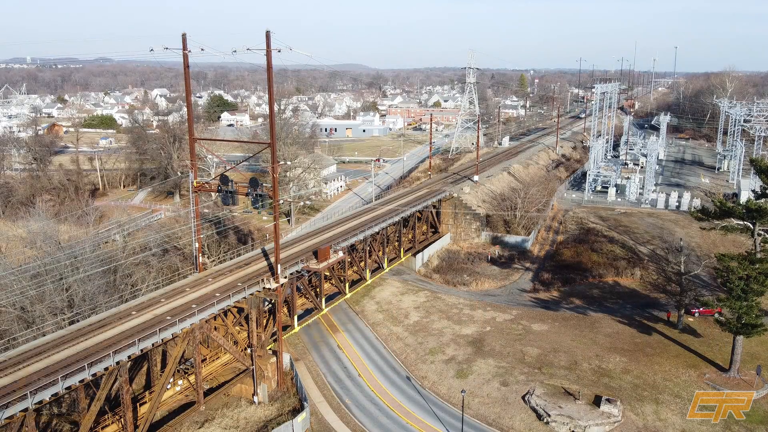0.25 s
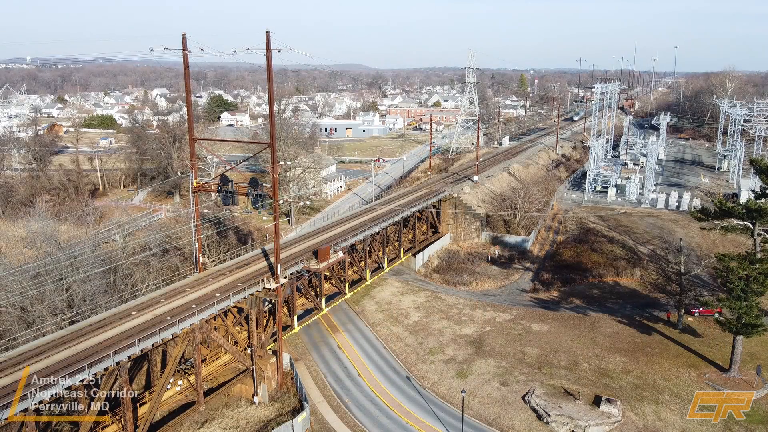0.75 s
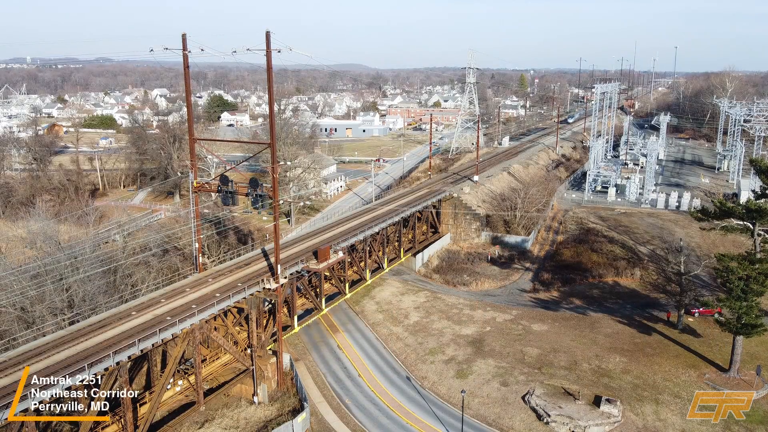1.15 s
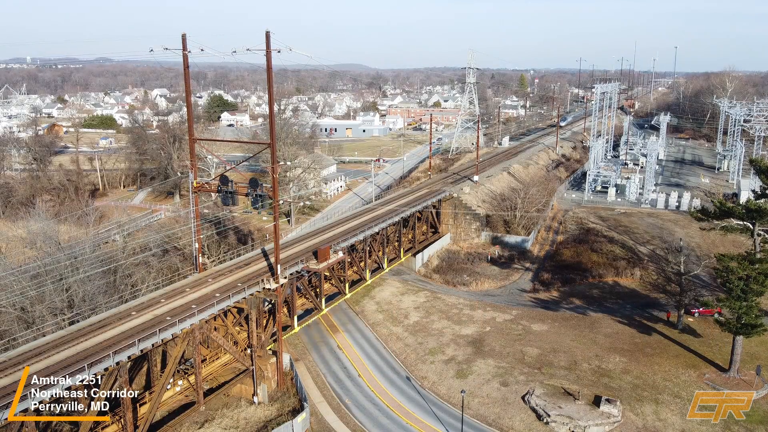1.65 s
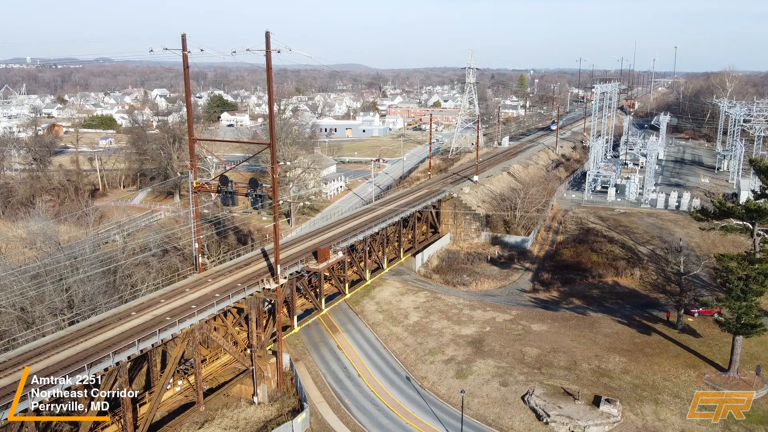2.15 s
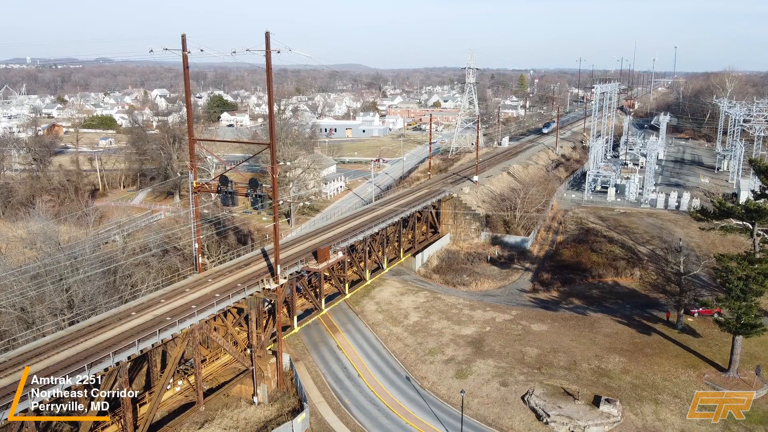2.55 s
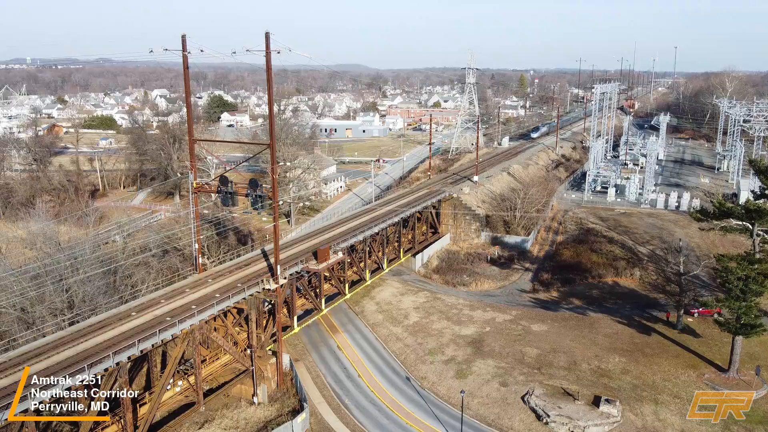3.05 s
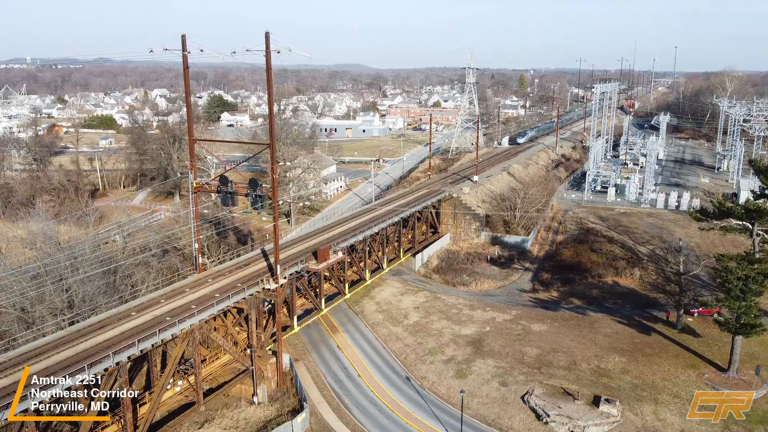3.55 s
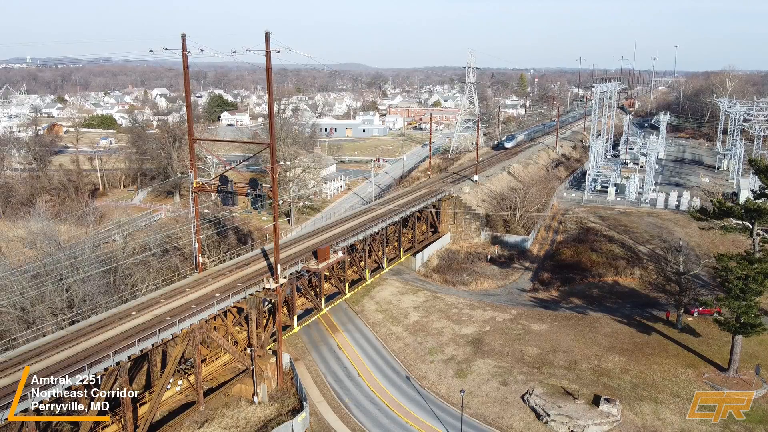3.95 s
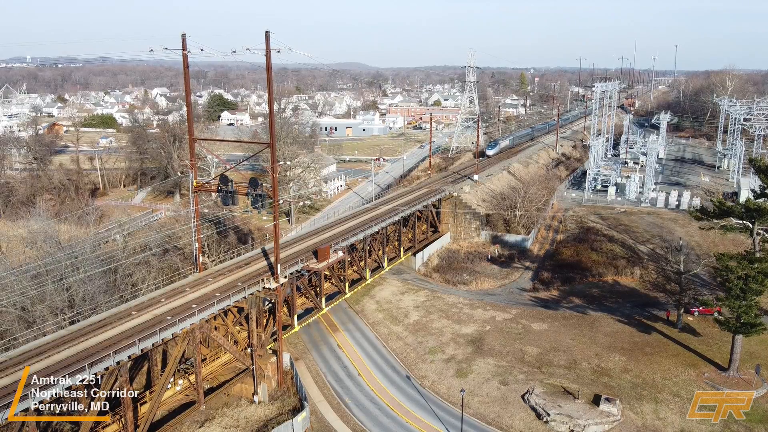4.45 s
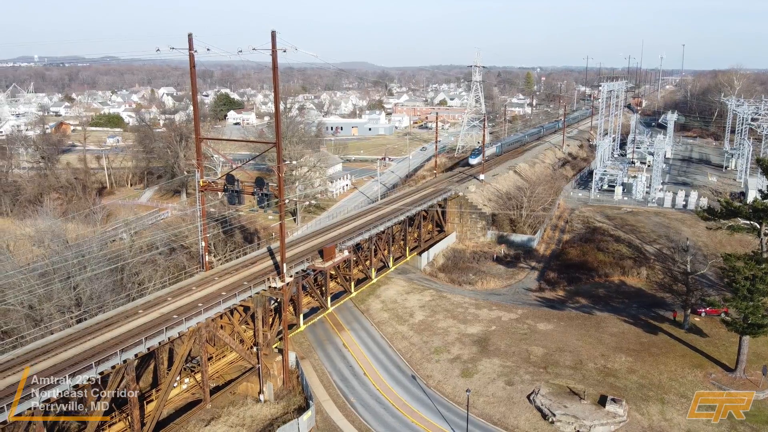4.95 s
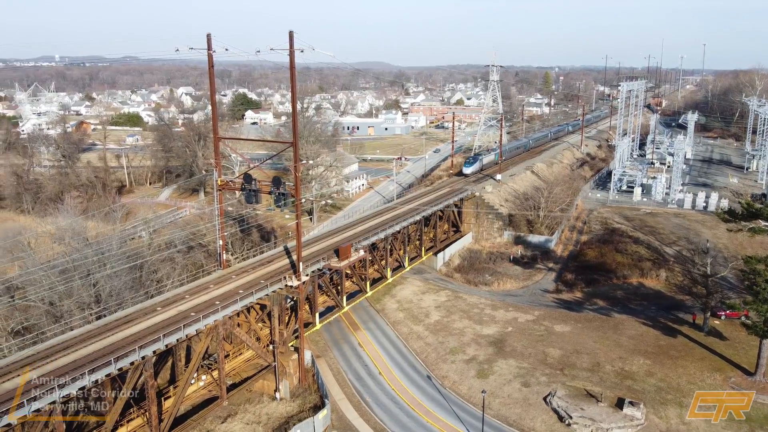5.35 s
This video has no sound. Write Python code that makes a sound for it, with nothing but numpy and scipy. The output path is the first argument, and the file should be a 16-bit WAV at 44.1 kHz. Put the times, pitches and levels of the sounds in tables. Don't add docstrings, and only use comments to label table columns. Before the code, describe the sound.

A faint town hum and gusty microphone rumble give way to an approaching train, its rolling roar growing over dull, booming thumps on a steel viaduct.

```python
import sys
import numpy as np
from scipy import signal
from scipy.fft import rfft, irfft, next_fast_len
from scipy.io import wavfile
from scipy.ndimage import uniform_filter1d

SR = 44100
rng = np.random.default_rng(int(sys.argv[2]) if len(sys.argv) > 2 else 0)


def decibels_to_gain(level_db):
    exponent = np.asarray(level_db, float) / 20
    return 10 ** exponent


def generate_wav(signal):
    frames = np.transpose(np.atleast_2d(signal))
    scaled = np.clip(frames, -1, 1) * 32767
    pcm = np.round(scaled).astype(np.int16)
    wavfile.write(sys.argv[1], SR, pcm)


N = 246519
TIME = np.arange(N) / SR
SIZE = next_fast_len(N)
BINS = np.log2(np.arange(1, SIZE // 2 + 2) * SR / SIZE)
SIDES = np.array([[1], [-1]])

# (frequency [Hz], likeness [0-1])
TRAIN_ALIKE = [(60, 0.98), (180, 0.42), (300, 0.21), (600, 0.27), (1000, 0.37), (2600, 0.27), (8000, 0.46)]
# (time [s], peak level [dB], mode frequency [Hz])
JOINTS = [(3.88, -28.5, 150), (3.969, -30.5, 158.4), (4.037, -39.5, 157), (4.148, -26, 143),
          (4.25, -29, 164), (4.469, -32.5, 117), (4.841, -28, 116), (4.908, -29.5, 130), (5.053, -26, 145),
          (5.349, -39, 130), (5.513, -20.5, 252.6)]
CLEAR_DB = -41.5


def along(points):
    hz, value = np.transpose(points)
    return np.interp(BINS, np.log2(hz), value)


def pan(db):
    return decibels_to_gain(SIDES * db / 2)


def walk(rate_hz):
    hold = int(SR / rate_hz)
    steps = np.repeat(rng.standard_normal(N // hold + 1), hold)
    return 1.13 * uniform_filter1d(uniform_filter1d(steps, hold), hold)[:N]


def wash(colour, alike, lo_hz, hi_hz, swell_db, flicker_db, rate_hz, tilt=lambda hz: 0):
    mid, side = rfft(rng.standard_normal((2, SIZE))) * decibels_to_gain(along(colour))
    pair = np.sqrt(1 + alike) * mid + SIDES * np.sqrt(1 - alike) * side
    inside = (BINS > np.log2(lo_hz)) & (BINS < np.log2(hi_hz))
    pair = pair * SIZE / np.sqrt(np.sum(abs(pair[:, inside]) ** 2))
    out, shared = 0, walk(rate_hz / 6)
    for octave in np.arange(3, 14.6, 0.5):
        mask = np.clip(1 - 2 * abs(BINS - octave), 0, 1)
        shared = 0.8 * shared + 0.6 * walk(rate_hz / 6)
        level_db = swell_db * shared + flicker_db * walk(rate_hz) + tilt(2 ** octave)
        out = out + decibels_to_gain(level_db) * irfft(pair * mask, SIZE)[:, :N]
    return out


def ring(at_s, hz, t60_s, size):
    t = np.clip(TIME - at_s, 0, 1)
    return size * np.sin(2 * np.pi * hz * t) * np.exp(-np.log(1000) * t / t60_s) * (t < 1)


def nearness():
    # (time [s], level [dB])
    approach = [(0, -58.5), (1.5, -53.5), (2.3, -48.5), (2.75, -45.5), (3.0, -44.5), (3.43, -41.5),
                (3.8, -38.5), (4.0, -37), (4.25, -36), (4.6, -35.5), (4.8, -34.5), (5.0, -34.5),
                (5.18, -33), (5.4, -32.5), (5.59, -29.5)]
    roar_db = np.interp(TIME, *np.transpose(approach))
    return roar_db, np.clip(roar_db - CLEAR_DB, 0, None)


def puffs_db():
    # (time [s], level over the rush [dB])
    puffs = [
        (5.205, 4.5),
        (5.5, 0.5),
    ]
    puff_s = 0.037
    return sum(db * np.exp(-((TIME - s) / puff_s) ** 2) for s, db in puffs)


def town():
    # (frequency [Hz], level [dB per Hz])
    town_colour = [(30, -16), (60, 6.5), (120, -2), (250, -12), (400, -11), (700, -11), (1050, -12.5),
                   (2200, -15), (2500, -25.5), (4000, -34), (6000, -40.5), (12000, -72)]
    # (frequency [Hz], likeness [0-1])
    town_alike = [(40, 1), (100, 0.96), (180, 0.69), (400, .2), (1500, 0.39), (6000, 0.11)]
    return decibels_to_gain(-51.0) * pan(-1.6) * wash(town_colour, along(town_alike), 65.6, 3000, 0.17, 0.76, 9.45)


def wind():
    # (time [s], peak level [dB], length [s])
    gusts = [(0.084, -40.5, 0.12), (0.313, -38, 0.026), (0.564, -37.5, 0.25), (0.97, -36.5, 0.15),
             (1.297, -41.5, 0.16), (1.62, -37, 0.1), (1.883, -34, 0.21), (2.38, -36.5, 0.27),
             (2.617, -36, 0.033), (2.81, -34, 0.14), (3.063, -34, .03), (3.152, -30, 0.044),
             (3.45, -32, 0.13), (3.74, -36.5, 0.14), (4.004, -37, 0.051), (4.35, -41, 0.21),
             (4.702, -39.5, 0.11), (4.998, -38.5, 0.15), (5.18, -35, 0.094), (5.476, -29, 0.13)]
    # (frequency [Hz], level [dB per Hz])
    buffet = [(8, 4), (20, 3), (42, 5), (55, -8.5), (80, -12), (140, -45.5), (600, -110)]
    lull_db = -51.5
    force = decibels_to_gain(lull_db) + sum(decibels_to_gain(db) * np.exp(-((TIME - s) / length_s) ** 2) for s, db, length_s in gusts)
    return force * decibels_to_gain(-0.97) * pan(1.5) * wash(buffet, 0.94, 8.4, 55, 0.74, 0.36, 6.6)


def far_birds():
    # (time [s], length [s], start frequency [Hz], end frequency [Hz], level [dB])
    chirps = [(.03, .025, 3900, 4400, -70), (.115, .02, 4700, 5300, -77), (.37, .03, 7600, 7700, -80),
              (.45, .05, 3750, 3600, -72), (.49, .025, 6000, 5650, -74), (.805, .025, 4900, 4850, -72),
              (.9, .03, 3600, 3600, -72), (1.125, .06, 5250, 5700, -72), (1.18, .06, 5700, 6050, -75),
              (1.62, .06, 5950, 5450, -75), (1.86, .06, 5350, 4300, -69), (2.44, .045, 7000, 7900, -78),
              (2.61, .07, 6300, 6700, -81), (2.68, .025, 7700, 7500, -79), (2.72, .025, 7500, 8000, -81),
              (2.98, .08, 7800, 8100, -80)]
    out = 0
    for s, length_s, start_hz, end_hz, db in chirps:
        u = np.clip((TIME - s) / length_s, 0, 1)
        hz = start_hz + (end_hz - start_hz) * u + 90 * walk(250)
        out = out + decibels_to_gain(db + 0.5) * np.sin(np.pi * u) * np.sin(2 * np.pi * np.cumsum(hz) / SR)
    return out * decibels_to_gain(3.3 * walk(150))


def near_bird():
    # (time [s], length [s], level [dB], start frequency [Hz], end frequency [Hz])
    trills = [
        (0.706, .095, -57, 9400, 9020),
        (0.835, 0.17, -68, 8230, 9200),
        (2.784, .205, -67.5, 9900, 8830),
    ]
    rest_hz, scoop_s, glide_ease = 8350, 0.02, 0.7
    end_drop_hz, end_drop_s = 600, 0.008
    swell_db, attack_s, release_s = 4, 0.015, 0.012
    trill_hz, trill_depth, depth_per_db, soft_call_db = 195, 0.32, 0.05, -67
    wall_echo_s, wall_echo_db = 0.217, -14
    out = 0
    for s, length_s, top_db, start_hz, end_hz in trills:
        t = np.clip(TIME - s, 0, length_s)
        db = top_db + swell_db * (t / length_s - 1)
        hz = start_hz + (end_hz - start_hz) * (t / length_s) ** glide_ease
        hz = hz + (rest_hz - start_hz) * np.exp(-t / scoop_s)
        hz = hz - end_drop_hz * np.exp((t - length_s) / end_drop_s)
        depth = np.clip(trill_depth + depth_per_db * (top_db - soft_call_db), 0.3, 0.8)
        beat = np.sin(2 * np.pi * np.cumsum(trill_hz * (1 + 0.08 * walk(62))) / SR)
        edge = np.interp(TIME, [s, s + attack_s, s + length_s - release_s, s + length_s], [0, 1, 1, 0])
        chop = np.clip(1 - depth * (1 - beat), 0, 1) * decibels_to_gain(3.1 * walk(110))
        hz = hz + 650 * depth ** 2 * beat + 100 * walk(140)
        out = out + edge * decibels_to_gain(db + 4.0) * chop * np.sin(2 * np.pi * np.cumsum(hz) / SR)
    return out + decibels_to_gain(wall_echo_db) * np.roll(out, int(wall_echo_s * SR))


def birds():
    direct = near_bird() * pan(3.8) + far_birds() * pan(-2.0)
    tail = rng.standard_normal((2, 6000)) * np.exp(-np.arange(6000) / SR / 0.04)
    return direct + decibels_to_gain(-33.5) * signal.fftconvolve(direct, tail, axes=1)[:, :N]


def lorry():
    # (multiple of base frequency, level [dB])
    lorry_orders = [
        (1, 0),
        (1.25, -9.5),
        (1.75, -8),
    ]
    start_s, shift_s, end_s, level_db = 0.96, 2.6, 2.8, -51.5
    idle_hz, gain_hz_per_s, tires_hz_per_s2, sag_hz_per_s = 90, 37, 5.5, 56
    pulling_s = np.minimum(TIME, shift_s) - start_s
    hz = idle_hz + gain_hz_per_s * pulling_s - tires_hz_per_s2 * pulling_s ** 2
    hz = hz - sag_hz_per_s * np.clip(TIME - shift_s, 0, 1)
    turn = 2 * np.pi * np.cumsum(hz) / SR
    fade = np.interp(TIME, [start_s - 0.1, start_s + 0.14, end_s - 0.2, end_s], [0, 1, 1, 0])
    engine = sum(decibels_to_gain(db + 2.0 * walk(8.94)) * np.sin(k * turn + 0.7 * walk(14)) for k, db in lorry_orders)
    return fade * decibels_to_gain(level_db + 2.0) * engine * pan(2.2)


def clacks():
    # (time [s], peak level [dB], ring frequency [Hz], rattle length [s], crack level [dB])
    clack_events = [
        (1.9832, -30.5, 1210, 0.00087, -24),
        (2.0751, -37, 1180, 0.0046, -17),
        (2.09, -35.5, 1190, 0.0066, -16),
        (2.1255, -37.5, 1020, 0.0016, -26),
    ]
    out = np.zeros(N)
    t = np.arange(1500) / SR
    crack_band = signal.butter(5, [2600, 5200], "band", fs=SR, output="sos")
    for s, db, hz, length_s, crack_db in clack_events:
        u = t / max(length_s, 0.0005)
        burst = rng.standard_normal(1500) * u * np.exp(-u)
        body_band = signal.butter(3, [0.62 * hz, 1.49 * hz], "band", fs=SR, output="sos")
        body = signal.sosfilt(body_band, burst)
        crack = signal.sosfilt(crack_band, burst)
        both = body / abs(body).max() + decibels_to_gain(crack_db) * crack / abs(crack).max()
        start = int(s * SR)
        out[start:start + 1500] += decibels_to_gain(db) * both
    return out * pan(-15.0)


def joints():
    thump = 0
    for s, db, hz in JOINTS:
        thump = thump + ring(s, hz, 0.14, decibels_to_gain(db))
        thump = thump - ring(s + 0.00397, 1.5 * hz, 0.11, decibels_to_gain(db - 14.0))
    return uniform_filter1d(thump, 60) * pan(-14.0)


def girders():
    # (frequency [Hz], level [dB per Hz])
    girder_colour = [(40, -19), (70, -1.5), (120, -1), (190, -4.5), (260, -6), (330, -10.5), (450, -17.5),
                     (700, -25.5), (3000, -110)]
    road_db, road_db_per_s = -52, 2
    on_deck_s, deck_load_s, deck_db = 3.16, 0.52, -2
    shudder_db, rise_s, fall_s = -9.5, 0.012, 0.053
    load = np.clip((TIME - on_deck_s) / deck_load_s, 0, 1)
    shudder = 0
    for s, db, _ in JOINTS:
        decay = np.where(TIME < s, (s - TIME) / rise_s, (TIME - s) / fall_s)
        shudder = shudder + decibels_to_gain(db + shudder_db) * np.exp(-decay)
    road = decibels_to_gain(road_db + road_db_per_s * np.minimum(TIME, on_deck_s))
    boom = np.hypot(road, load ** 2 * decibels_to_gain(nearness()[0] + deck_db) + shudder)
    boom_pan_db = np.interp(TIME, [2.5, 3.9], [1.5, -7])
    noise = wash(girder_colour, along(TRAIN_ALIKE), 86.6, 320, 0.96, 1.08, 10)
    return decibels_to_gain(-1.5) * boom * pan(boom_pan_db) * noise


def air_rush():
    # (frequency [Hz], level [dB per Hz])
    air_colour = [(1500, -40), (4500, 0), (7000, 0.5), (10000, -10.5), (12500, -18.5), (16000, -36)]
    rush_db, rush_per_db = -78, 1.4
    nose_s, nose_db_per_s = 4.75, 10.5
    level_db = rush_db + rush_per_db * (nearness()[0] - CLEAR_DB) + puffs_db()
    level_db = level_db + nose_db_per_s * np.clip(TIME - nose_s, 0, None)
    fade_in = 2 * np.clip(TIME - 2.7, 0, 0.5)
    return decibels_to_gain(level_db) * fade_in * pan(-2.1) * wash(air_colour, 1.0, 5300, 11000, -2.8, 2.4, 20)


def gear_whine():
    hz = 2247 + 8 * walk(15)
    return decibels_to_gain(-24.0 + 3 * walk(20)) * np.sin(2 * np.pi * np.cumsum(hz) / SR)


def train():
    # (frequency [Hz], level [dB per Hz])
    rolling = [(60, -50), (200, -22.5), (380, -6.5), (570, -3), (900, -1.5), (1000, -2.5), (1350, -6),
               (2230, -11.5), (2430, -14.5), (3500, -20.5), (5000, -26.5), (7000, -44.5), (10000, -51),
               (16000, -91)]
    treble_far_db, treble_per_db, puff_treble_share = -15.5, 0.36, 0.41
    hollow_far_db, hollow_per_db = -10.5, 0.95
    roar_db, clear_db = nearness()
    treble_db = treble_far_db + treble_per_db * clear_db + puff_treble_share * puffs_db()
    hollow_db = hollow_far_db + hollow_per_db * clear_db

    def path_db(hz):
        air = (treble_db + 13) * min((hz / 3300) ** 2.9, 2.5)
        ground = (hollow_db + 5.5) * np.exp(-(np.log2(hz / 460) / 0.67) ** 2)
        return air + ground

    roar = wash(rolling, along(TRAIN_ALIKE), 650, 1600, 0.3, 1.2, 13, path_db)
    return decibels_to_gain(roar_db) * pan(-8.5) * (roar + gear_whine())


def scene():
    background = town() + wind() + birds() + lorry()
    return background + clacks() + joints() + girders() + air_rush() + train()


def roll_off(x):
    return signal.sosfilt(signal.butter(12, 15720, fs=SR, output="sos"), x)


def record(dry):
    # (frequency [Hz], level [dB per Hz])
    hiss_colour = [(1000, -27), (6000, -6.5), (9000, -3.5), (13000, -7), (16000, -6)]
    lag = uniform_filter1d(np.diff(dry[1], prepend=dry[1, 0]), size=6)
    hiss = decibels_to_gain(-81.0) * wash(hiss_colour, 0.99, 6000, 15600, 1.5, 1.5, 4.8)
    return roll_off(np.array([dry[0], dry[1] - lag]) + hiss)


dry = scene()
out = record(dry)
generate_wav(out)
```